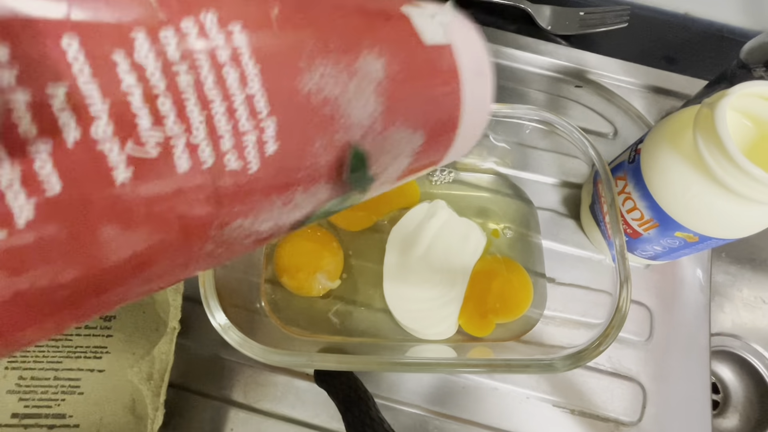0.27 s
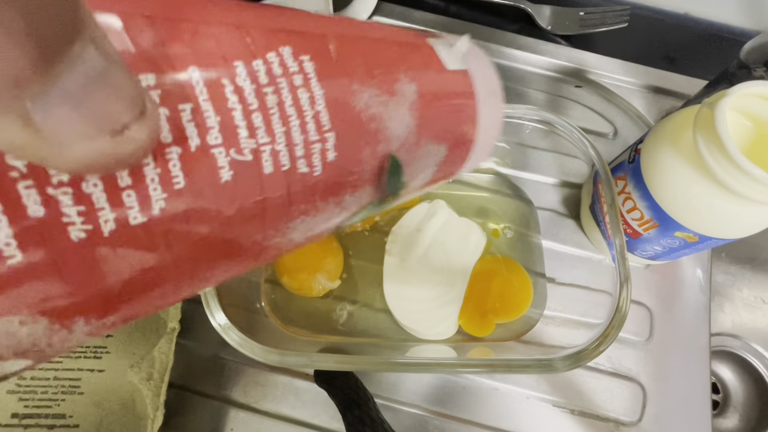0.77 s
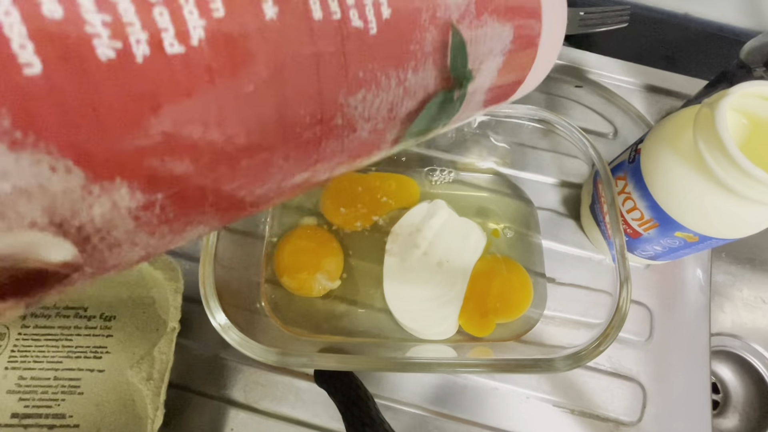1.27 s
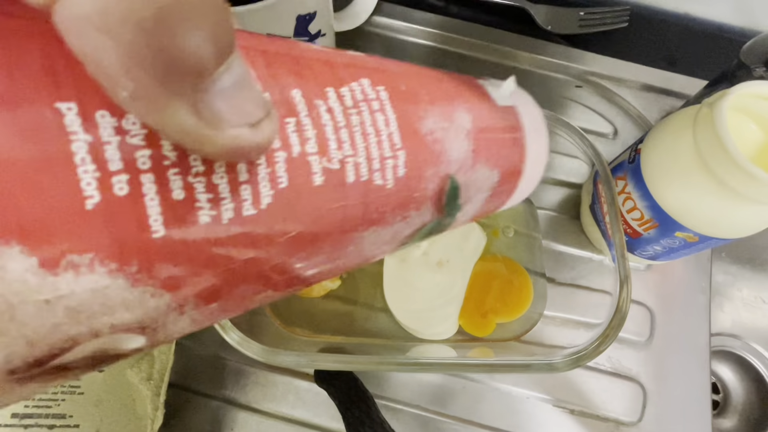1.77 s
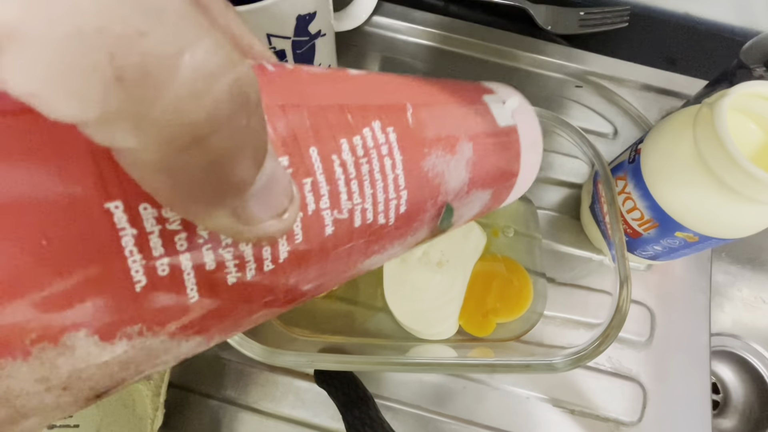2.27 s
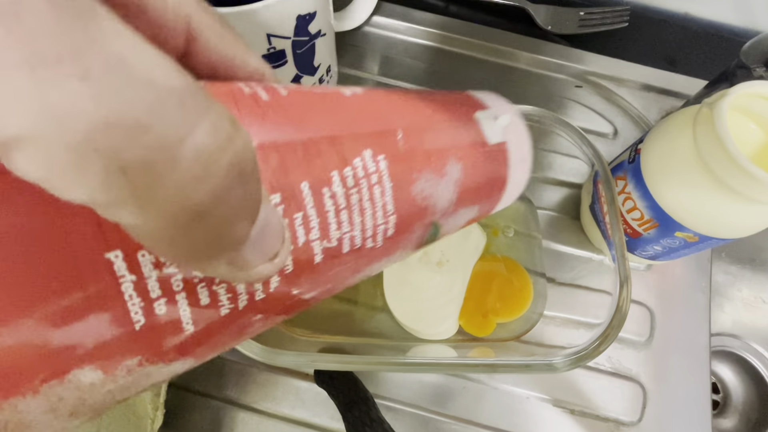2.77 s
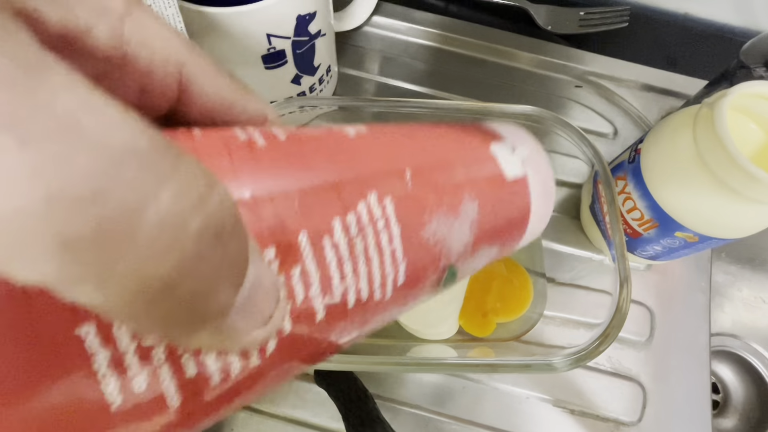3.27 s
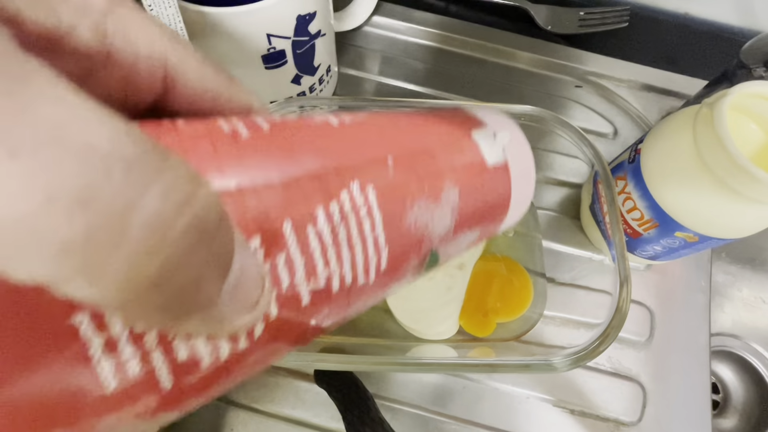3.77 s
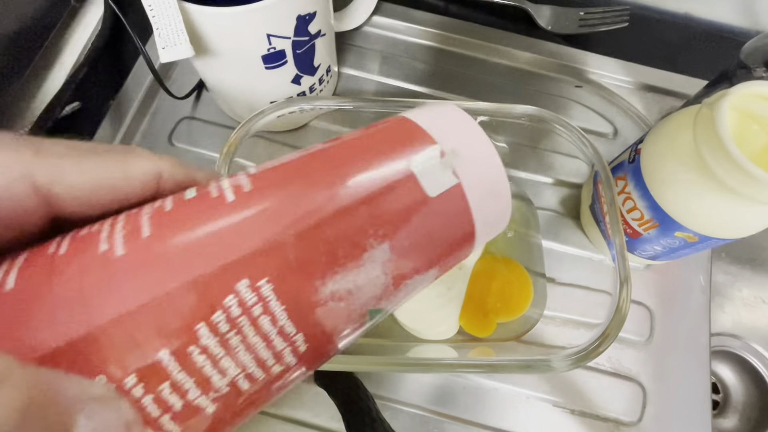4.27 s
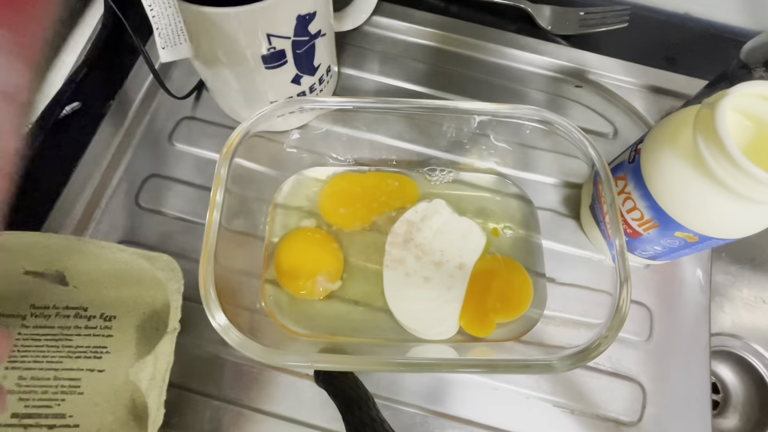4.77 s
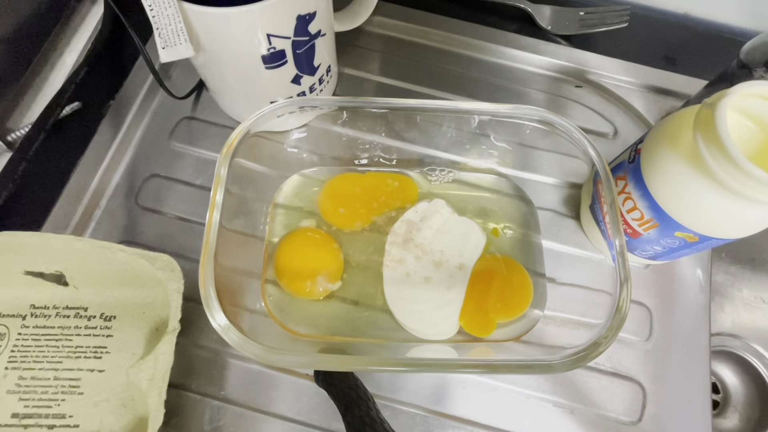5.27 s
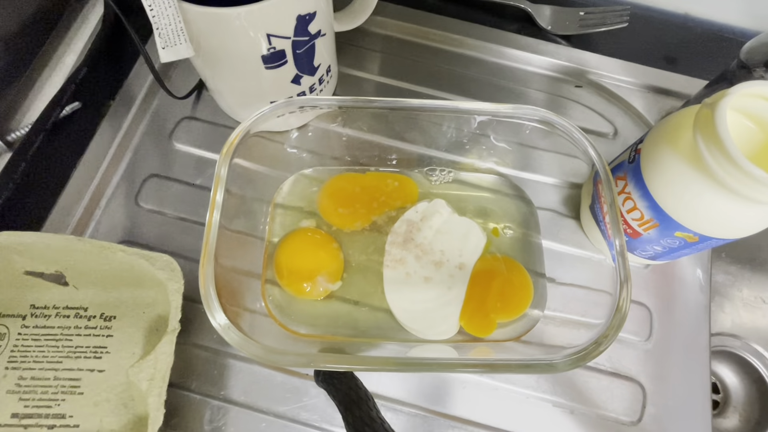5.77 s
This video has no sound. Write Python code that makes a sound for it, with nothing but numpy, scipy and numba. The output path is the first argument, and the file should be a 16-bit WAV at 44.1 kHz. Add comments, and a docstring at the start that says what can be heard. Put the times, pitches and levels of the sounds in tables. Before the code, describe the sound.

Fine salt shaken in short gritty bursts inside a cardboard canister, then one hollow knock and a sliding hiss, over a low kitchen hum.

```python
"""Salt is shaken from a cardboard canister over eggs in a glass dish, close by in a small kitchen.
Filtered random impulses make each shake: grains slip along the tube, then land and slap its wall.
Then one hollow knock, a sum of swelling sine modes, sounds, with four fainter bumps after it.
Turned upright, the canister lets the salt slide back: a long hiss through moving tube resonances.
An appliance's low hum and air (coloured noise) and thin whine (a wavering sine) last throughout."""
import sys
import numpy as np
from scipy import signal
from scipy.fft import rfft, irfft
from scipy.io import wavfile
from scipy.ndimage import uniform_filter1d
from numba import njit

SR = 44100
rng = np.random.default_rng(int(sys.argv[2]) if len(sys.argv) > 2 else 0)


def wrap_up_sound(samples):
    """Save the sound to the file named by the first command line argument, as 16-bit audio."""
    columns = np.atleast_2d(samples).T
    # keep every value between -1 and 1, then stretch to whole-number steps
    tamed = np.clip(columns, -1, 1)
    steps = np.round(tamed * 32767).astype(np.int16)
    wavfile.write(sys.argv[1], SR, steps)


N = 265437
TIME = np.arange(N) / SR

# hollow knocks: onset t/s, relative level/dB, weakening of the modes away from 700 Hz/(dB per octave),
# factor on the rise time of the modes
KNOCK_EVENTS = [(4.2983, -10.5, 0, 0.97), (4.4195, -28, 16, .8), (4.6735, -32, 18, .8),
                (5.181, -35, 15, .8), (5.415, -36, 15, .8)]


def shaken_salt(slip_db=2.0, hit_db=2, wall_db=0, trickle_db=-81):
    """Granular impact noise: salt slips back with a dull hiss, lands brightly, slaps the wall and settles."""
    # shakes: landing t/s, relative level/dB, half length (power 1/e)/s, hardness (0 = slips along the tube,
    # 1 = hits the end), backswing slip re landing/dB, wall slap re landing/dB
    shakes = [(0.182, -54.5, 0.016, .45, -5, -14), (0.38, -47, 0.0074, 0.8, -6.5, 5.5),
              (0.477, -50, 0.013, 0.58, -7, -14), (0.562, -52, 0.014, .45, -7.5, -14),
              (0.667, -50.5, 0.013, 0.73, -4.5, -12), (0.771, -47.5, 0.013, 0.77, -4.5, 2.5),
              (0.872, -46, 0.011, 1, -13, -2.5), (0.99, -47.5, 0.015, 0.7, -5, -9),
              (1.093, -57.5, 0.013, .85, -6, -14), (1.739, -56, .014, .54, -6.5, -14),
              (1.845, -54.5, 0.011, .2, -6, -14), (1.946, -50.5, 0.015, 0.83, -5, -14),
              (2.003, -56.5, 0.012, .45, -14, -14), (2.619, -45, 0.01, 0.72, -5.5, 5.5),
              (2.767, -44, 0.014, 0.94, -13, -4), (2.892, -42, 0.0081, 0.83, -12, -6.5),
              (2.978, -54, 0.015, 0.63, -19, -14), (3.232, -48.5, 0.015, 0.53, -7, 2.5),
              (3.363, -50, .017, 0.72, -2.5, 2), (3.486, -46, 0.017, .75, -4, -1),
              (3.597, -55, 0.016, .4, -3, -14), (3.732, -46.5, 0.013, 0.72, -4.5, -5),
              (3.844, -53.5, 0.023, 0.51, -2, -14), (3.953, -57.5, 0.028, .47, -8, -14)]
    # loose slips as the wrist turns: t/s, relative level/dB, half length (power 1/e)/s
    loose_slips = [(0.012, -69, 0.06), (0.225, -61.5, .035), (2.287, -72, 0.022), (2.476, -62, 0.013),
                   (2.683, -53.5, 0.023), (3.107, -63.5, 0.014), (4.335, -71, 0.057), (5.397, -58, .012),
                   (5.538, -64, 0.0046), (5.693, -66, 0.0096), (5.76, -65, 0.02), (5.85, -70.5, 0.054)]
    # colours: f/Hz, relative spectral density/dB
    slip_colour = [(500, -13), (1500, -4), (2100, 3), (2450, -3), (3050, 3), (3600, 0.5), (4400, -0.5),
                   (5500, -1.3), (7500, -16), (9000, -28.5), (11200, -34.5), (13000, -24.5), (14500, -14.5),
                   (15700, -5)]
    hit_colour = [(450, -8.5), (900, -5.5), (1500, -4), (1800, -6), (2050, 3.5), (2450, -5.5), (3050, -1),
                  (3500, 0.5), (5000, 1.5), (6800, -1.5), (9300, -10.5), (11500, -24.5), (13000, -18),
                  (15500, 2)]
    wall_colour = [(120, -3), (300, 0), (450, 0), (720, -6), (950, 4), (1300, -12.5), (1600, 7),
                   (1820, -10), (2080, 6), (2500, -6), (5000, -13.5), (11500, -25.5), (15500, -11)]
    settle_db, settle_s = -13.5, 0.029  # grains keep tumbling after each landing
    slip_hardness = 0.27  # few grains hit the end during a slip

    slip_power = sum(surge(*row) for row in loose_slips)
    hit_power, slap = np.zeros(N), np.zeros(N)
    for s, db, half, hardness, back_db, slap_db in shakes:
        lead = 0.032 + 1.23 * half  # s from backswing slip to landing
        back = surge(s - lead, db + back_db, 0.4 * lead)
        landing = surge(s, db, half) + surge(s + settle_s / 2, db + settle_db, settle_s)
        # hardness divides the power between hitting and slipping
        hit_power += hardness * landing + slip_hardness * back
        slip_power += (1 - hardness) * landing + (1 - slip_hardness) * back
        slap += undb(db + slap_db) * swell(s - 0.0045, 0.0043)

    clumps = undb(1.3 * walk(130))  # the salt moves in small clumps
    slipping = undb(slip_db) * np.sqrt(slip_power) * clumps * grains(13000, spread_db=-0.5)
    hitting = undb(hit_db) * np.sqrt(hit_power) * clumps * grains(8000, spread_db=1)
    slapping = undb(wall_db) * slap * grains(4700, spread_db=2.5)
    # until the first knock, while the canister is held over the dish, stray grains keep creeping
    held_over_dish = TIME < KNOCK_EVENTS[0][0]
    trickle = undb(trickle_db + 1.6 * walk(9.3)) * held_over_dish * grains(1500, spread_db=-1.0)

    dull = tint(slipping + trickle, slip_colour)
    bright = tint(hitting, hit_colour)
    return tube_echo(dull + bright + tint(slapping, wall_colour))


def knocks(tick_db=-31, ring_db=-17, thud_db=-19, thud_hz=95, boom_db=-15, rattle_db=-42,
           scuff_db=-17, rough=0.29):
    """Modal superposition: knocks scuff and share hollow modes; the hard first adds tick, thud and rattle."""
    # modes: f/Hz, relative level/dB, rise time before each knock's factor/s
    modes = [(203, -17.5, .009), (325, -18, 0.0099), (405, -26, 0.014), (457.6, -3.5, 0.0065),
             (647.4, -3.5, 0.0075), (822, -16.5, 0.0048), (960, -13.5, 0.0018)]
    # colours: f/Hz, relative spectral density/dB
    tick_colour = [(300, -12), (1200, 5.5), (1900, 7), (2400, -1), (3200, 3.5), (4500, 0), (5900, -5),
                   (6900, -21), (8000, -24.5), (11500, -40), (15500, -25)]
    scuff_colour = [(150, -1.5), (350, 1), (560, 2.5), (820, 5), (1000, -6.5), (1350, -7.5), (1700, -17.5),
                    (3000, -28), (6000, -36.5), (8000, -62)]

    ringing = np.zeros(N)
    for k, (hz, mode_db, rise) in enumerate(modes):
        octaves = abs(np.log2(hz / 700))  # light bumps ring mostly the modes near 700 Hz
        mode = np.zeros(N)
        for s, db, narrowing, length in KNOCK_EVENTS:
            level = undb(db + mode_db - narrowing * octaves)
            mode += level * swell(s, rise * length) * np.sin(2 * np.pi * hz * (TIME - s))
        # neighbouring modes start in opposite directions and beat; loose contact roughens them
        ringing += (-1) ** k * mode * (1 + rough * walk(350))

    hard, hard_db = KNOCK_EVENTS[0][:2]
    tick_envelope = swell(hard - .0005, 0.00072) + undb(ring_db) * swell(hard, 0.0072)
    tick = tick_envelope * noise(tick_colour)
    thud_envelope = swell(hard + 0.012, 0.0072) + undb(boom_db) * swell(hard + 0.031, 0.03)
    thud = thud_envelope * np.sin(2 * np.pi * thud_hz * (TIME - hard))
    # light bumps are more scuff and less ring
    scuffs = sum(undb(db + scuff_db + 0.22 * (hard_db - db)) * swell(s, 0.0076)
                 for s, db, *_ in KNOCK_EVENTS)
    rattle = undb(rattle_db) * swell(hard, 0.045)
    rubbing = (scuffs + rattle) * noise(scuff_colour)
    return ringing + undb(tick_db) * tick + undb(thud_db) * thud + rubbing


def sliding_salt(level_db=1.5, lower_db=0.0, upper_db=3.0, rub_db=-45, creep_db=-59.5):
    """Resonance excited by flow noise: a fine stream runs down the tube; the bulk settles with a scuffle."""
    # flow of salt back down the tube: t/s, relative level/dB
    flow_levels = [(4.64, -80), (4.74, -59), (5.11, -55), (5.214, -65.5), (5.4, -65.5), (5.46, -78),
                   (5.554, -70), (5.666, -79.5), (5.688, -84), (5.912, -86), (5.98, -82)]
    # colours: f/Hz, relative spectral density/dB
    stream_colour = [(1000, 1), (2700, -5.5), (3500, 1.5), (4300, 1.5), (5500, 3.5), (6400, -0.5),
                     (7300, -5.5), (9200, -10.5), (10500, -19.5), (11600, -20), (13000, -18), (14200, -3),
                     (15700, -2)]
    rub_colour = [(150, 3), (330, -5), (460, 4), (550, -7), (650, 5.5), (850, -5), (1350, -5),
                  (1900, -17.5), (3000, -38), (8000, -51)]

    start, flow = flow_levels[0][0], curve(flow_levels)
    # the lower resonance dips and recovers as the bulk passes
    lower_hz = 4520 - 870 * np.exp(-((TIME - 5.13) / 0.21) ** 2)
    # the upper one sinks 3600 Hz per s until it meets the lower
    upper_hz = np.maximum(9240 - 3600 * np.maximum(TIME - start, 0), lower_hz)

    hiss = tint(grains(12000, spread_db=-0.5), stream_colour)
    stream = undb(level_db + 1.2 * walk(66)) * flow * (TIME > start) * hiss
    # the first creeping grains ring only the lower resonance, which grows strongest with the fullest stream
    creep = undb(creep_db) * swell(4.33, 0.25) * rng.standard_normal(N)
    lower = undb(lower_db) * resonance(flow / flow.max() * stream + creep, lower_hz, 400.)
    upper = undb(upper_db) * resonance(stream, upper_hz, 1120.0)
    scuffle = tint(swell(4.948, 0.056) * grains(600, spread_db=1.5), rub_colour)
    in_tube = tube_echo(stream + lower + upper, lag_ms=1.084, wander=0.13, bounce=0.13)
    return in_tube + undb(rub_db) * scuffle


def tube_echo(x, lag_ms=1.056, wander=0.218, bounce=.33):
    """Multiple reflection: two echoes in the canister's air gap, their lag wandering as the salt moves."""
    lag = lag_ms / 1000 * (1 + wander * walk(9))
    first = bounce * np.interp(TIME - lag, TIME, x)
    second = bounce ** 2 * np.interp(TIME - 2 * lag, TIME, x)
    return (x + first + second) / np.hypot(1, bounce)


def kitchen(x, t60=0.16, wet_db=-21):
    """Reverberation: short, dense, exponentially decaying reflections from cupboards and tiles."""
    t = TIME[:SR // 2]
    decay = np.exp(-np.log(1000) * t / t60)  # falls 60 dB in t60 s
    build_up = np.minimum(t / 0.024, 1)
    tail = rng.standard_normal(len(t)) * decay * build_up
    return x + undb(wet_db) * signal.fftconvolve(x, tail / np.linalg.norm(tail))[:N]


def appliance(hum_db=-40.0, air_db=-54.0, whine_db=4.0):
    """Broadband and tonal machine noise: a low rumble, moving air and one wavering motor tone."""
    # level of the whine: t/s, relative level/dB
    whine_levels = [(0.0, -54.5), (0.42, -63.5), (0.53, -57), (0.7, -67.5), (1.0, -61.5), (1.14, -52),
                    (1.32, -69), (1.66, -60), (2.08, -70), (2.13, -55), (2.4, -55), (2.58, -67),
                    (2.61, -53.5), (3.35, -67), (3.42, -58), (4.04, -63.5), (4.32, -52.5), (4.36, -61),
                    (4.83, -60.5), (5.38, -66), (5.93, -53), (6.02, -64)]
    # colours: f/Hz, relative spectral density/dB
    hum_colour = [(25, -11), (42, -20.5), (60, 3.5), (76, -4), (100, 2.5), (160, 0.5), (190, -8),
                  (235, -12.5), (260, -18), (320, -17), (400, -51), (800, -80)]
    air_colour = [(200, -4.5), (420, -1.5), (700, -1), (1020, 2), (1300, -4), (1650, -14), (2300, -24),
                  (3300, -25), (3950, -26), (4300, -18), (4850, -39.5), (5600, -31), (6500, -40),
                  (10000, -51), (15500, -43.5)]

    hum = undb(hum_db + 1.1 * walk(5)) * noise(hum_colour)
    air = undb(air_db + .5 * walk(11.0)) * noise(air_colour)
    whine_hz = 1109 * (1 + 0.0012 * walk(13))
    phase = 2 * np.pi * np.cumsum(whine_hz) / SR
    return hum + air + undb(whine_db) * curve(whine_levels) * np.sin(phase)


def grains(per_s, spread_db):
    """Shot noise: tiny impacts of uneven size at a given mean rate, scaled to unit power."""
    chance = np.clip(per_s / SR, 1e-4, 1)  # per sample
    sizes = rng.standard_normal(N) * undb(spread_db * rng.standard_normal(N))
    clicks = (rng.random(N) < chance) * sizes
    return clicks / clicks.std()


def surge(s, db, half):
    """Gaussian power envelope: a rush of grains rises and falls around its peak."""
    out = np.zeros(N)
    near = slice(max(int((s - 4 * half) * SR), 0), int((s + 4 * half) * SR))
    out[near] = undb(2 * db) * np.exp(-((TIME[near] - s) / half) ** 2)
    return out


def swell(start, rise):
    """Damped transient envelope: it peaks at 1 a rise time after its start and then dies away."""
    out = np.zeros(N)
    near = slice(int(start * SR), int((start + 10 * rise) * SR))
    age = (TIME[near] - start) / rise
    out[near] = age ** 2 * np.exp(2 * (1 - age))
    return out


@njit
def resonance(x, hz, width):
    """Second-order resonance: a band-pass with a moving centre, of gain 1 there."""
    y, band, low = np.empty(len(x)), 0., 0.  # output and the two integrator states
    for i in range(len(x)):
        g = np.tan(np.pi * hz[i] / SR)
        damping = width / hz[i]
        v = (band + g * (x[i] - low)) / (1 + g * (g + damping))
        band = 2 * v - band
        low += 2 * g * v
        y[i] = damping * v
    return y


def tint(x, colour, size=16384):
    """Minimum-phase filtering: a causal filter of the given colour; white noise keeps its power."""
    hz, db = np.transpose(colour)
    log_hz = np.log(np.fft.rfftfreq(size, 1 / SR) + 1)
    gain = undb(np.interp(log_hz, np.log(hz), db))
    cepstrum = irfft(np.log(gain / np.sqrt(np.mean(gain ** 2))), size)
    # folding the cepstrum onto positive times makes the filter causal
    cepstrum[1:size // 2] *= 2
    cepstrum[size // 2 + 1:] = 0
    return signal.fftconvolve(x, irfft(np.exp(rfft(cepstrum)), size))[:N]


def noise(colour):
    """Spectral shaping: coloured Gaussian noise of rms about 1."""
    return tint(rng.standard_normal(N), colour)


def walk(rate):
    """Slow random modulation: levels held 1 / rate s and slewed, of standard deviation 1."""
    k = max(int(SR / rate), 1)
    steps = np.repeat(rng.standard_normal(N // k + 1), k)[:N]
    slewed = uniform_filter1d(steps, k)
    return slewed / slewed.std()


def curve(rows):
    """Level interpolation: gain along a table of t/s, level/dB."""
    return undb(np.interp(TIME, *np.transpose(rows)))


def undb(db):
    """Logarithmic level: decibels to amplitude gain."""
    return 10 ** (np.asarray(db) / 20)


def scene():
    """Linear superposition: salt and knocks reverberate in the room, over the appliance."""
    sources = shaken_salt() + knocks() + sliding_salt()
    return (kitchen(sources) + appliance())[None]


def record(dry):
    """Band limiting: the deepest bass is dropped, the top cut steeply, and the ends fade within 4 ms."""
    bass_cut = signal.butter(5, 42, "highpass", fs=SR, output="sos")
    top_cut = signal.ellip(12, .1, 80, 15800, fs=SR, output="sos")
    fade = np.minimum(np.minimum(TIME, TIME[::-1]) / .004, 1)
    return signal.sosfilt(top_cut, signal.sosfilt(bass_cut, dry) * fade)


dry = scene()
out = record(dry)
wrap_up_sound(out)
```